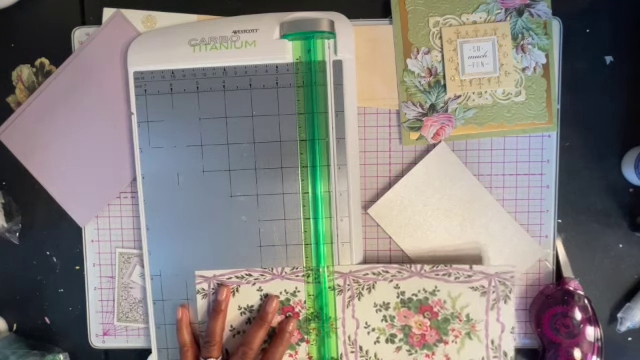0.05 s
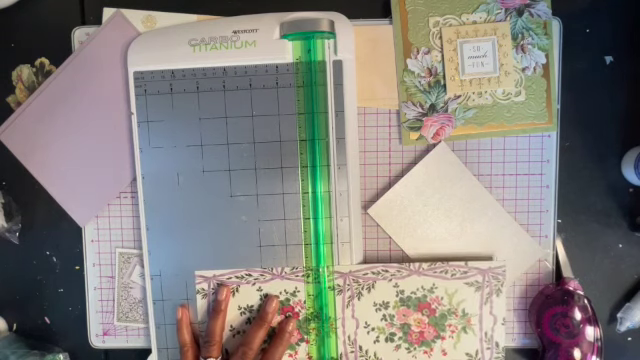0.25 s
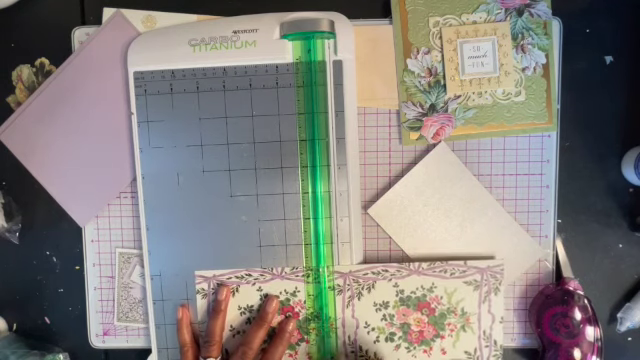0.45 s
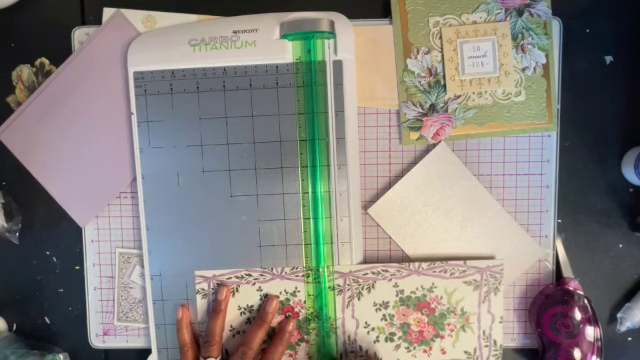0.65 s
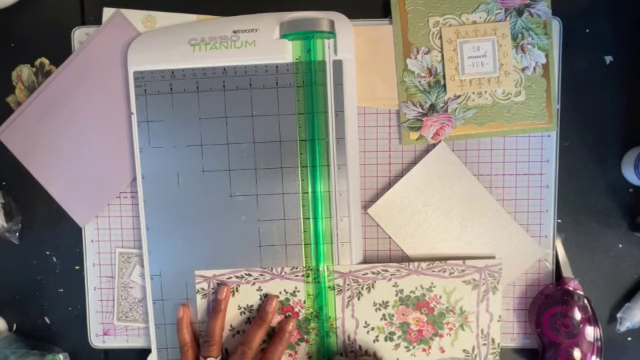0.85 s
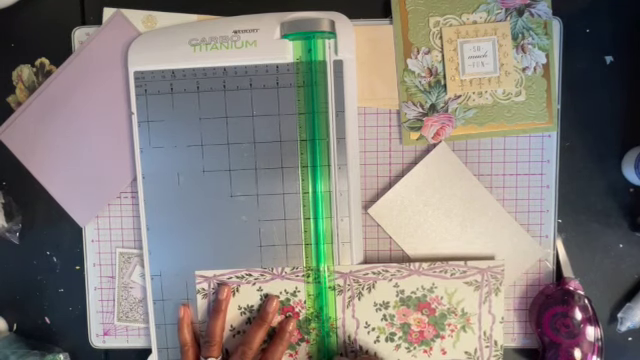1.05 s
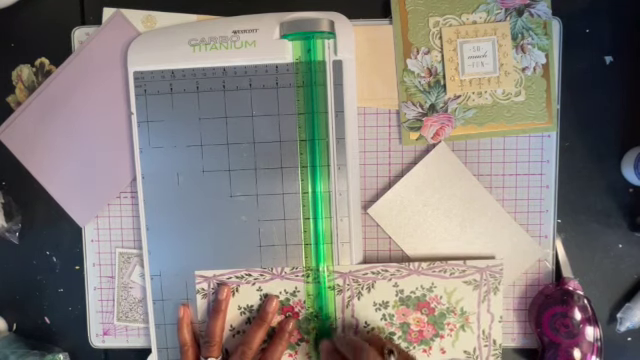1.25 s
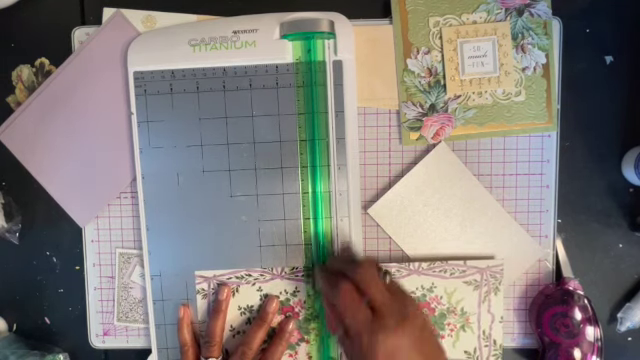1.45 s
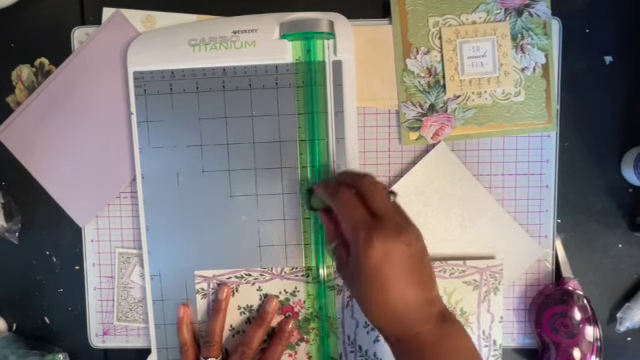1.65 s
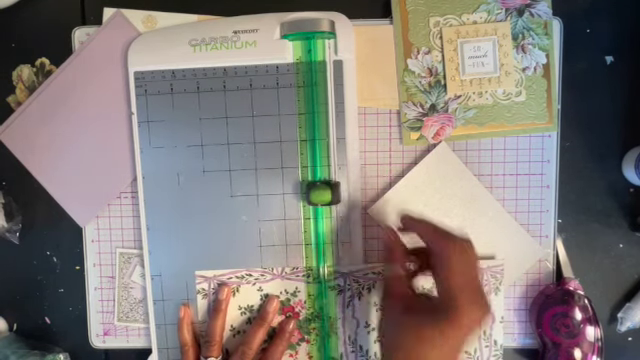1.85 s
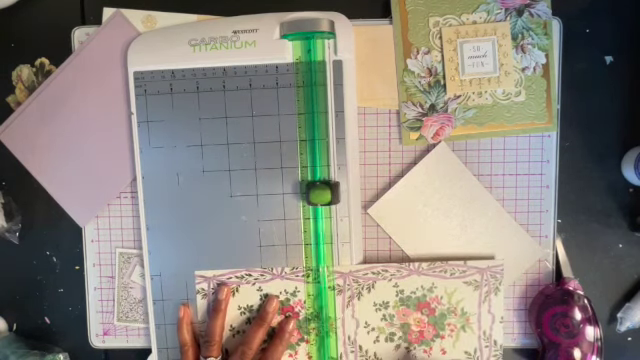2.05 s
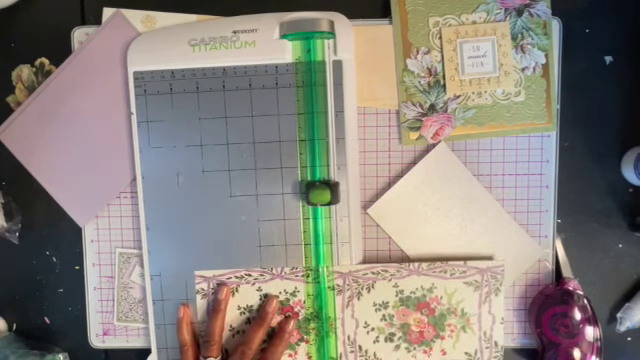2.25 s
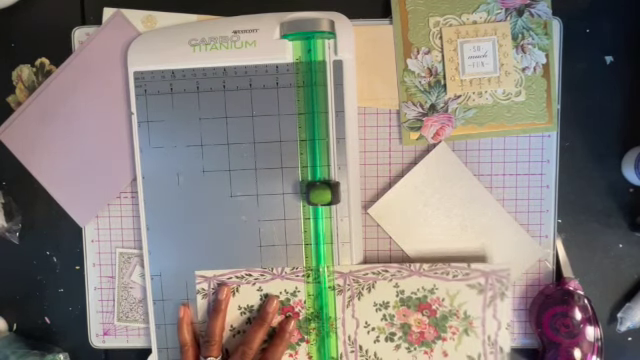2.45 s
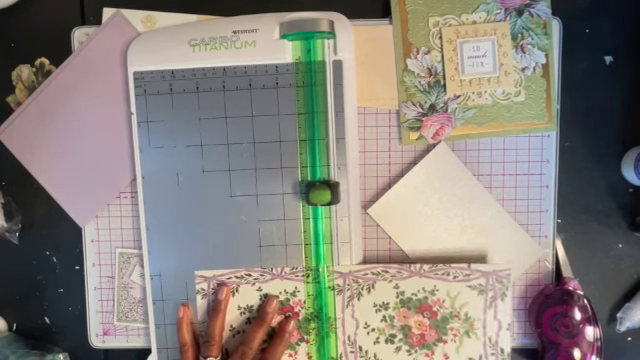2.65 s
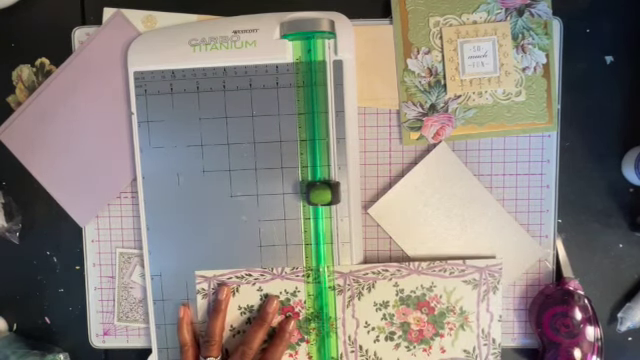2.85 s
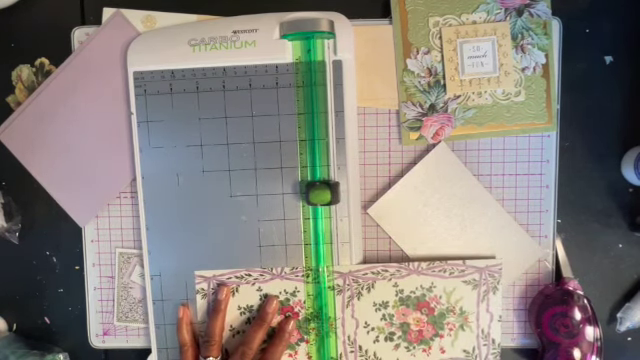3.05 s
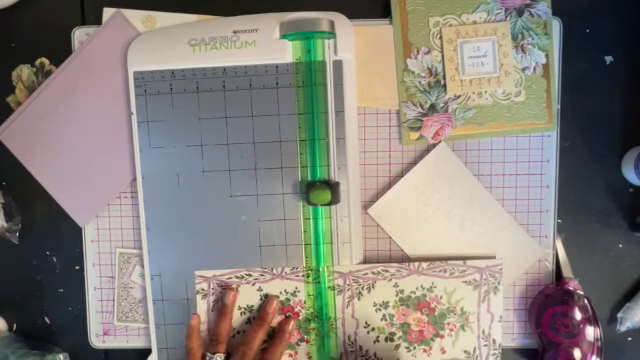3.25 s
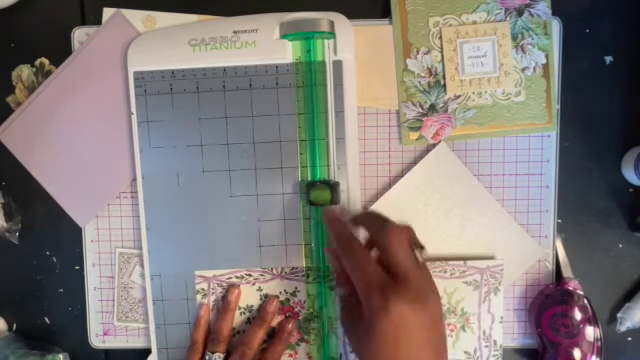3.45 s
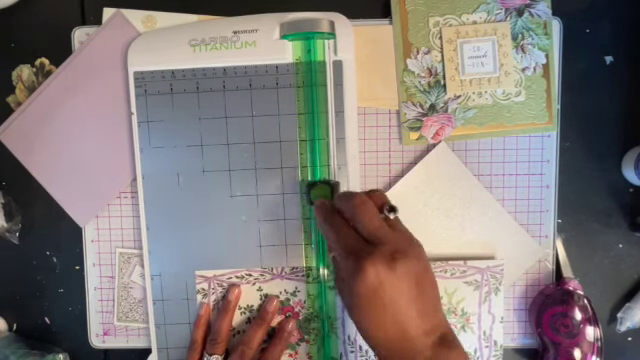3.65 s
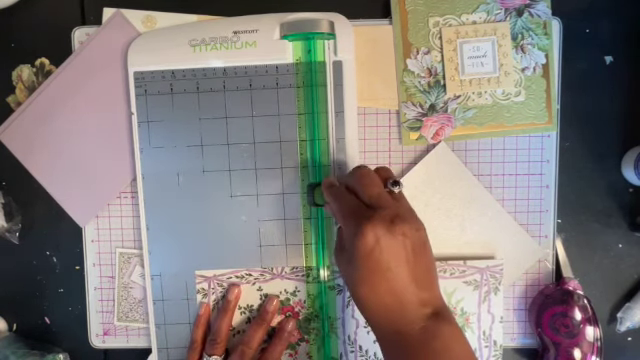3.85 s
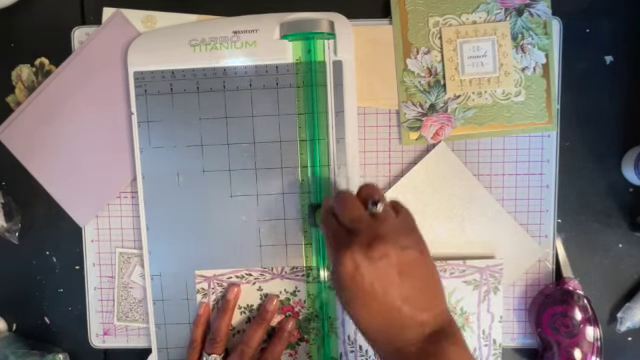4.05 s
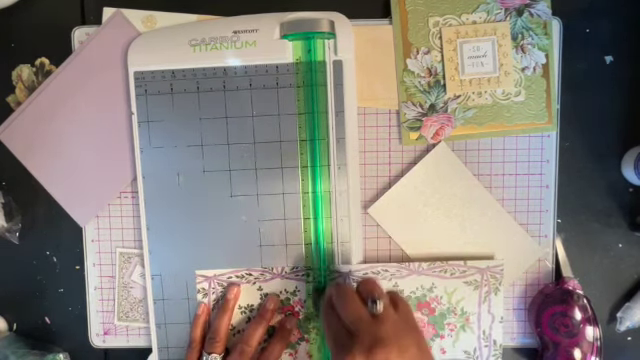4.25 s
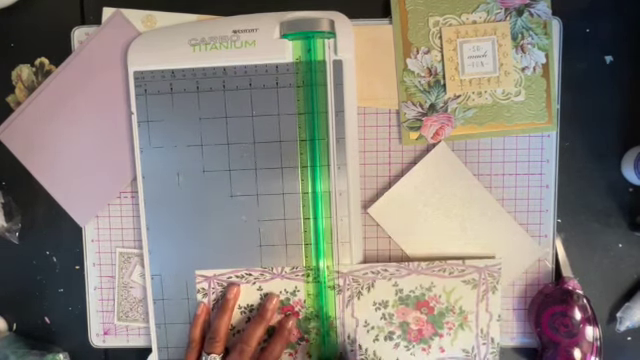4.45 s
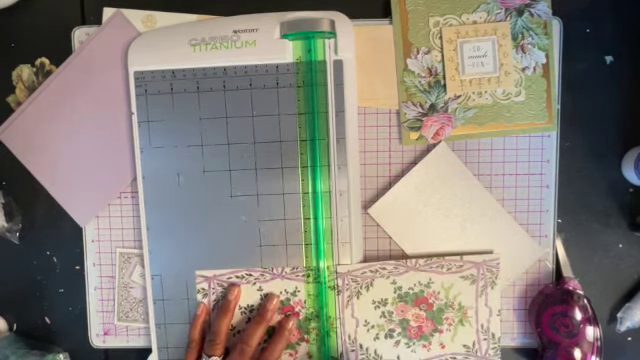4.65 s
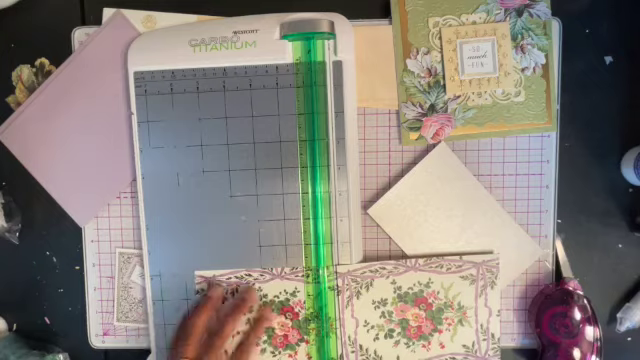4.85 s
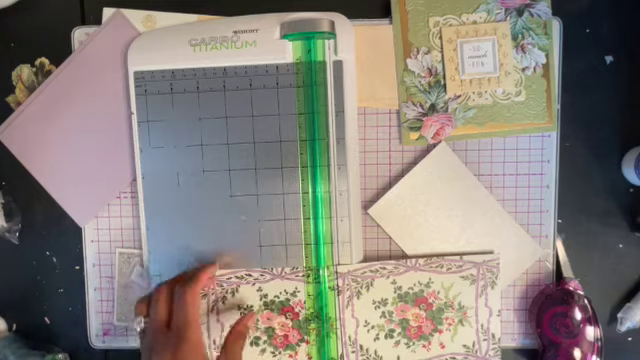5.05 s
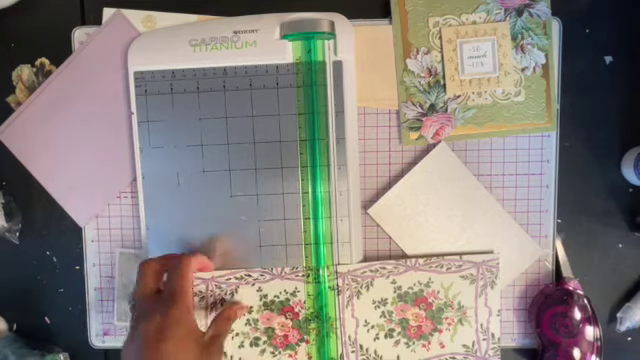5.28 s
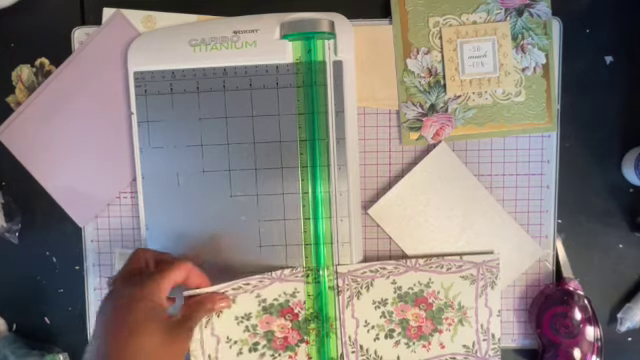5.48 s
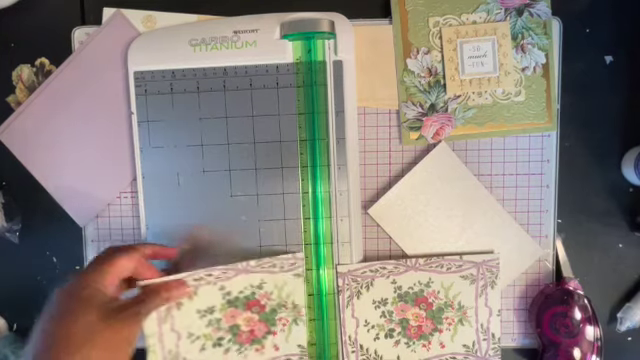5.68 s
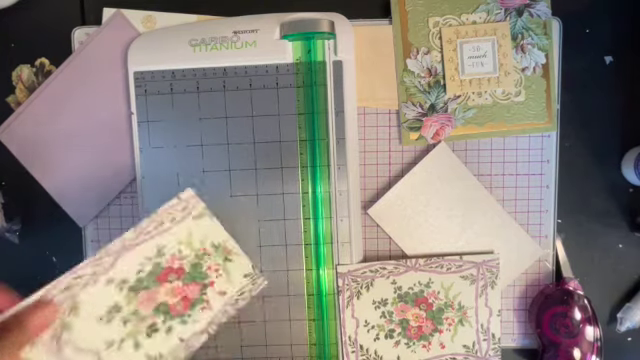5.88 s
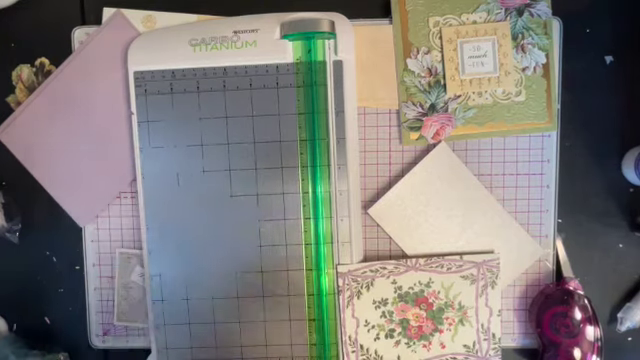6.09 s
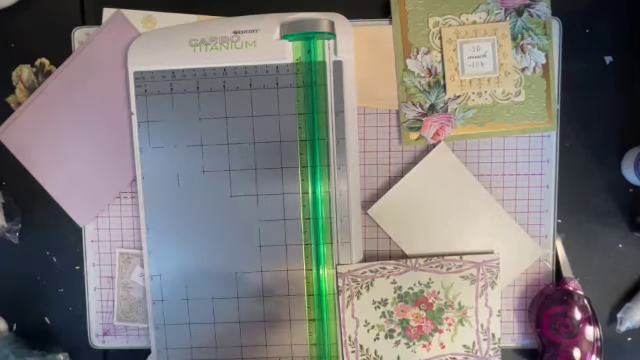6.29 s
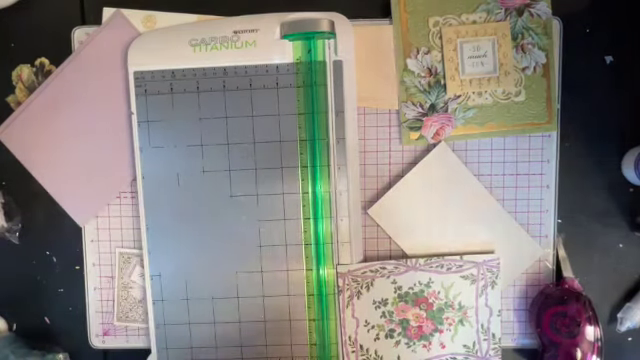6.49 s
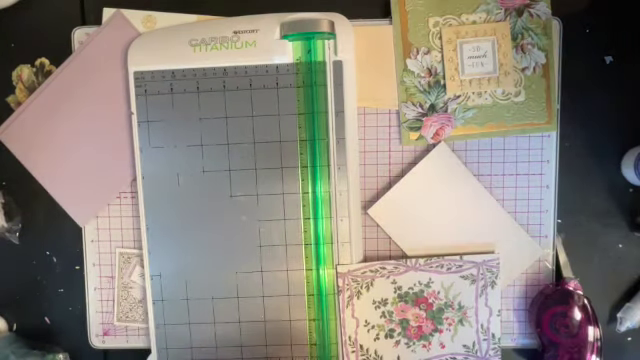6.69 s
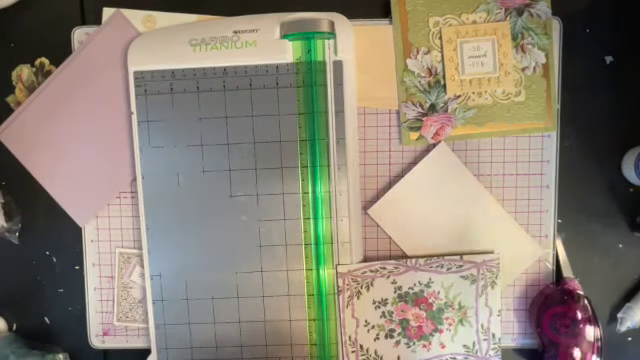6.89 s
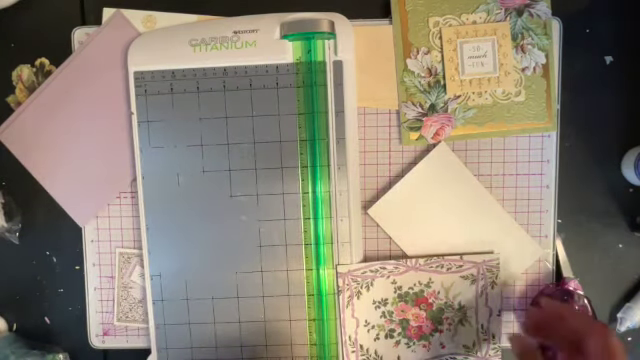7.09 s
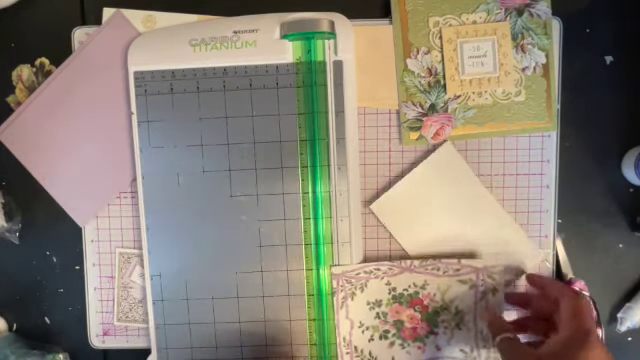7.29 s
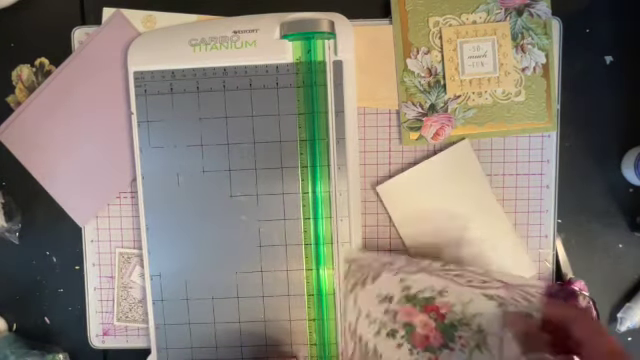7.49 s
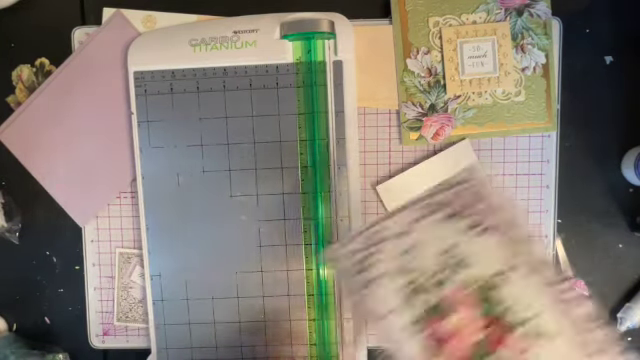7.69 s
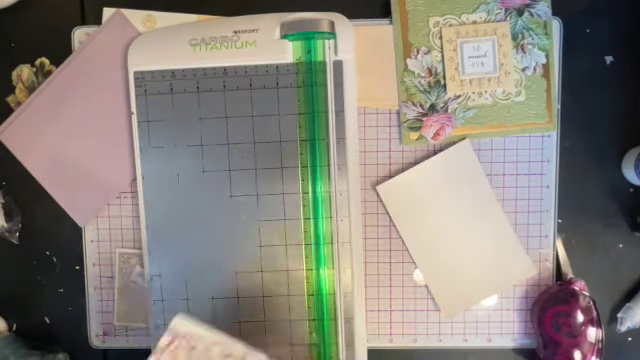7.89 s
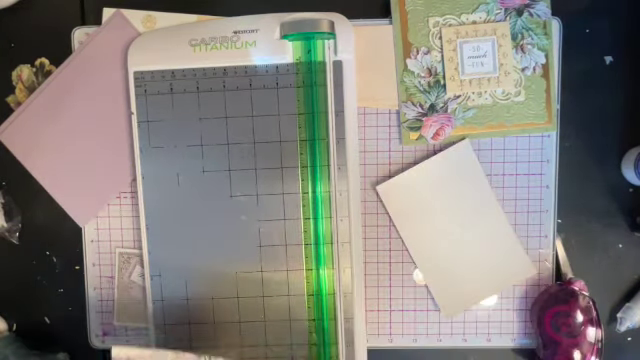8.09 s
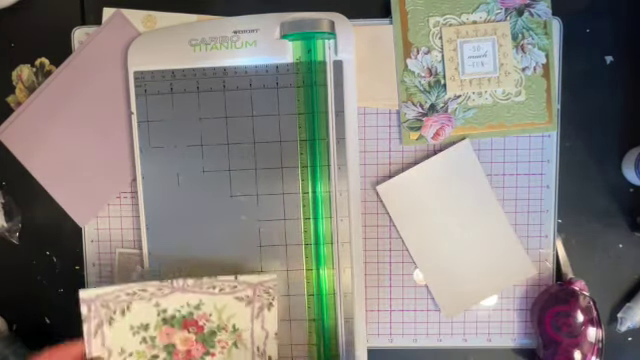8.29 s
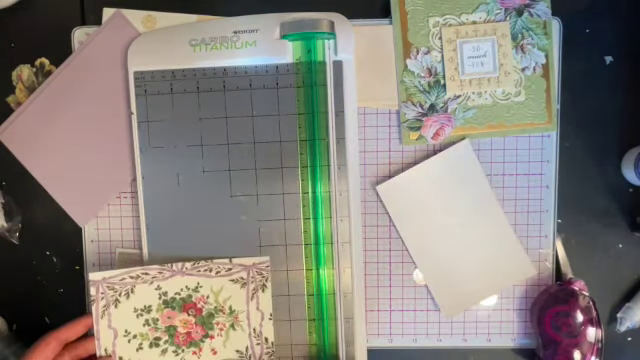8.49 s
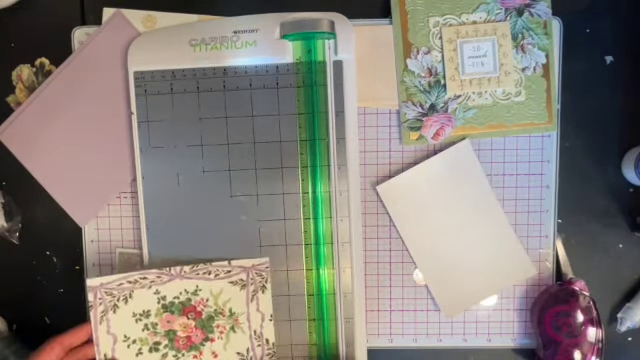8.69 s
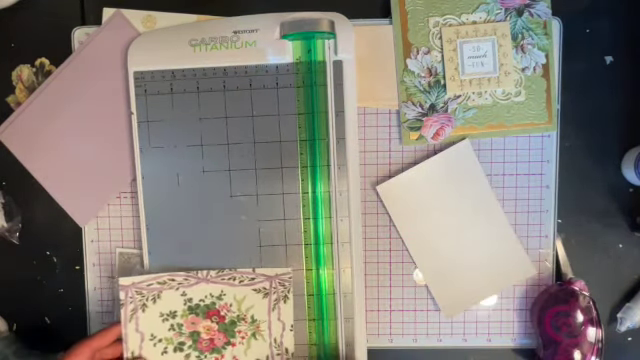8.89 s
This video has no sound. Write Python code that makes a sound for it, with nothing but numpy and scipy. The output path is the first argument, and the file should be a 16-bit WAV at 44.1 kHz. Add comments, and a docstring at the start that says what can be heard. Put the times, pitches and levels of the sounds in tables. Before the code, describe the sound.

Hollow plastic taps and tiny nail clicks open over a low hush of room air. A blade carriage slides lightly up its rail, clicks and rests. After a quiet gap it knocks, rips briskly through stiff card and hits its stop. Card edges drag and crackle, the rail snaps, card swishes away, and a table knock makes the trimmer ring briefly. Close, dry, small-room stereo sound.

```python
"""A plastic paper trimmer cuts cardstock on a craft table, heard by two close microphone ports in a small quiet room.
The guide rail is pressed down, the blade carriage slides up it, then is drawn back through the card to its end stop.
The rail is lifted, the two halves slide off the deck, and a hand knocks on the table as it picks one up.
Noise bursts and damped modes make the contacts; shaped noise makes friction, card and room air; gliding
resonances make the scrapes."""
import sys
import numpy as np
from scipy import signal
from scipy.fft import rfft, irfft, next_fast_len
from scipy.io import wavfile
from scipy.ndimage import uniform_filter1d, map_coordinates

SR = 44100
rng = np.random.default_rng(int(sys.argv[2]) if len(sys.argv) > 2 else 0)


def to_wav(s):
    """Save 16-bit WAV."""
    ch = np.atleast_2d(s).T  # columns
    pcm = np.round(np.clip(ch, -1, 1) * 32767)  # PCM
    wavfile.write(sys.argv[1], SR, pcm.astype(np.int16))


N = 393792

# Event levels are at the source, before panning and room. t60 is the time of a 60 dB decay.
# A rise or fall is the time taken by 20 dB.

# colour of the room air: f/Hz, level/dB
AIR_COLOUR = [(20, -21.5), (60, 0), (170, 1.5), (330, -12), (500, 0), (900, -10.5), (1200, -18),
              (2200, -18.5), (4000, -30.5), (15000, -49.5)]

# swishes of card faces and hands: peak t/s, level/dB, rise/s, fall/s
CARD_SWISHES = [(0.01, -50.5, 0.052, 0.075), (1.43, -51, 0.055, 0.2), (2.551, -58.5, 0.078, 0.24),
                (3.05, -58.5, 0.071, 0.057), (4.83, -63.5, 0.17, 0.99), (4.929, -50, 0.031, 0.03),
                (5.155, -48, 0.024, 0.0048), (5.27, -57, 0.059, 0.36), (5.442, -43.5, 0.012, 0.028),
                (5.62, -49.5, .12, 0.24), (5.944, -54.5, 0.024, 0.023), (6.094, -45, 0.006, 0.068),
                (6.18, -48, 0.047, 0.17), (6.201, -40.5, .012, 0.012), (6.8, -61, 0.28, 0.71),
                (7.235, -45, 0.032, 0.13), (7.384, -47.5, 0.11, 0.017), (7.475, -45, 0.079, 0.082),
                (7.682, -50, 0.063, 0.061), (7.946, -43, 0.13, 0.19), (8.328, -60.5, 0.15, 0.5),
                (8.76, -62.5, 0.22, 1)]
# the cut edge dragged out from under the rail in tugs: start t/s, stop t/s, level/dB, rise/s, fall/s
EDGE_DRAGS = [(5.415, 5.447, -50, .02, 0.045), (5.553, 5.699, -39, 0.054, 0.022)]
# card sticking and slipping under pressed fingers: start t/s, stop t/s, level/dB, rise/s, fall/s
CARD_JUDDERS = [(2.179, 2.25, -36, 0.021, 0.028), (2.577, 2.623, -49, 0.023, 0.05),
                (3.072, 3.083, -44, 0.044, 0.024)]
# colours of card face, cut edge and juddering card: f/Hz, level/dB
FACE_COLOUR = [(40, -6), (200, -3), (1400, -3), (4500, -6.5), (7000, -3.5), (11000, -13.5), (15500, -7)]
EDGE_COLOUR = [(350, -25.5), (630, -3), (850, -17), (1500, -11), (3100, -1), (4800, -6.5), (7000, -6.5),
               (15500, -14)]
JUDDER_COLOUR = [(60, -22), (180, 3.5), (360, 8.5), (480, -1), (680, -3), (1400, -9), (4000, -29.5),
                 (12000, -51.5)]

# sharp clicks of nails and card corners:
# t/s, tick level/dB, deck body re tick/dB, time for the chatter to fall 16 dB/s
CLICK_EVENTS = [(0.149, -54, -11.5, 0.0063), (0.921, -56, 2, 0.0044), (0.993, -62.5, 9.5, 0.0057),
                (2.086, -52.5, -4, 0.0014), (2.108, -50.5, -13, 0.0015), (2.491, -41.5, -15, 0.0023),
                (2.745, -51, -13.5, 0.0049), (4.132, -46, 4, 0.031), (6.135, -43.5, -1, 0.013),
                (6.16, -41, -13, 0.0037), (6.255, -46, -17.5, .01), (6.612, -54, -0.5, 0.02),
                (7.244, -27.5, -2, 0.011), (7.254, -32, 1, 0.0062), (7.846, -57.5, 2.5, 0.024),
                (8.229, -49, -4, 0.0076), (8.856, -49, -11.5, 0.0029)]
# thump over body; snap over tick, which also grows with the body's share (dB per dB)
CLICK_THUMP_DB, CLICK_SNAP_DB, SNAP_PER_BODY = 1, 0.5, 0.76

# knocks of rail, carriage and card on the deck:
# t/s, ring level/dB, thump re ring/dB, snap re ring/dB
DECK_KNOCKS = [(0.357, -33.5, -8.5, -3.5), (0.682, -40, -0.5, -14.5), (0.72, -53, 2, -4),
               (0.774, -38.5, -5, -8.5), (0.829, -51.5, -5, -16), (0.939, -45.5, -11, -15.5),
               (1.229, -45.5, -5, -19), (1.269, -39.5, -32, -8), (1.302, -45.5, -10, -7),
               (1.336, -45.5, -8, -11), (1.523, -49.5, -12, -7), (1.555, -49, -13, -20),
               (1.678, -52, -2, -5), (1.793, -48.5, 1, -10.5), (2.14, -39.5, 2, -4.5),
               (2.164, -37.5, -18, -12.5), (2.216, -37, -13, -26.5), (2.336, -53, 7.5, -18),
               (3.518, -52.5, 7.5, -5.5), (3.781, -27, -9.5, -17.5), (3.844, -30, -8.5, -7.5),
               (3.849, -32.5, -6, -17), (4.518, -25, -6.5, -5.5), (4.6, -54, -14, 6.5),
               (4.716, -33.5, -7.5, -2), (4.762, -42, -5, -28), (4.927, -46.5, 0.5, -22.5),
               (4.977, -38, -0.5, -7), (5.11, -33, -8.5, -19), (5.218, -47, -8, -15),
               (5.233, -38, -6, -17.5), (5.51, -37, -15.5, -15.5), (5.711, -24, -13, -6),
               (7.285, -39.5, 1, -9), (8.458, -39.5, -5, -13)]
CHATTER_S, KNOCK_TICK_DB = 0.0075, -8  # chatter's time to fall 16 dB; top octaves re snap
# the trimmer's base on the table, nominal modes: f/Hz, level/dB, t60/s
BASE_MODES = [(139.2, 1, 0.13), (191.7, 0.5, 0.069), (236.1, 0, 0.098), (385, -3, 0.076)]
# its plastic deck, nominal modes: f/Hz, level/dB, t60/s
DECK_MODES = [(575, -2, 0.033), (636.8, -0.5, 0.08), (754.8, 0, 0.059), (872, -4.5, 0.037),
              (1362, -5.5, 0.028)]
FIRM_DB, FIRM_GROWTH = -38.5, 0.47  # above this level the third deck mode is lifted (dB; dB per dB)
# colours of a contact's crack, top-octave tick, plastic clatter and table thump: f/Hz, level/dB
CRACK_COLOUR = [(600, -11), (1900, 2), (2950, 2), (4700, -8), (9000, -26)]
TICK_COLOUR = [(2500, -15.5), (5200, 8.5), (7400, 4), (16000, -7)]
CLATTER_COLOUR = [(380, -25), (700, 1.5), (1700, -14.5), (3200, -41)]
TABLE_COLOUR = [(18, -15.5), (50, 3.5), (130, -7.5), (300, -11), (900, -41.5)]

# dull bumps of hands, carriage and flexing card: t/s, level/dB, f/Hz, t60/s
DULL_BUMPS = [(0.37, -38, 226, 0.058), (0.69, -35, 219, 0.067), (2.166, -32.5, 373, 0.047),
              (2.218, -36, 332, 0.059), (3.358, -57, 850, .04), (3.545, -41, 135, 0.11),
              (4.145, -41, 149, 0.16), (4.515, -29, 201, 0.089), (4.844, -27, 237.3, 0.13),
              (5.745, -36, 131, 0.23), (5.884, -47.5, 395, 0.06), (6.034, -47, 407, 0.07),
              (6.14, -42, 405, 0.027), (6.257, -47.5, 1140, 0.02), (7.113, -33.5, 151, 0.16),
              (7.245, -26, 303, 0.026), (7.765, -43, 434, 0.068), (8.242, -50, 493, 0.058),
              (8.679, -47.5, 780, 0.13)]
BUMP_RISE_S = .006  # time constant of the soft onset

# the carriage pushed up the rail, then pulled back:
# start t/s, stop t/s, run-up/s (per 20 dB), starting rumble level/dB, hiss level at the ends/dB, pitch ratio
CARRIAGE_STROKES = [(1.15, 1.66, 0.027, -56.5, -61, 1.05), (4.046, 4.518, 0.13, -42, -55.5, 1.057)]
COAST_S, SAG_DB_PER_S, MID_STROKE_DB = 0.032, 9.5, 6  # fall; hand pressure eases; hiss peaks with speed
CUT_START, CUT_STOP, CUT_DB = 4.2, 4.505, -38  # the blade is in the card (s, s, dB)
BITE_S, EXIT_S = 0.013, 0.012  # rise and fall of the cut
# colours of the rumble (before the stroke's pitch ratio), rail hiss and cutting blade: f/Hz, level/dB
RUMBLE_COLOUR = [(45, -5), (240, -2), (350, -21), (480, -14.5), (620, 3), (750, -1), (1150, -10),
                 (3500, -33.5)]
GLIDE_COLOUR = [(800, -8), (1350, -3), (2200, -8), (2620, 5), (3000, -1), (4000, -8), (9500, -11)]
BLADE_COLOUR = [(500, -16), (1100, -4.5), (1800, -8.5), (3100, -5), (4500, -11), (6600, -7), (7400, 3.5),
                (8600, -10), (11000, -30), (15500, -7)]

# the rail rattling under hand or carriage, and the carriage striking its end: t/s, level/dB
RAIL_CLACKS = [(1.207, -48), (2.164, -40.5), (2.22, -45), (4.519, -24), (4.599, -43.5)]
# the guide rail, nominal modes: f/Hz, level/dB, t60/s
RAIL_MODES = [(883, -1, 0.037), (1127, -12, 0.055), (1363, 4, 0.025), (1955, -5.5, 0.029),
              (2600, -17, 0.033)]

# the rail snaps as it is jogged, unlatched and dropped: t/s, level/dB, f/Hz, pan towards the left port/dB
STRIP_SNAPS = [(1.302, -45, 2600, -3), (4.716, -28, 2510, -3), (5.711, -26, 3300, 0.5)]
SNAP_S, SNAP_RING_DB, SNAP_RING_S = 0.003, -17.5, 0.014  # snap t60; after-ring level and t60

# scrapes gliding as carriage, blade or card edge travels: start t/s, stop t/s, from f/Hz, to f/Hz, level/dB
GLIDING_SCRAPES = [(4.054, 4.123, 730, 761, -45), (4.205, 4.268, 1000, 1096, -42.5),
                   (4.295, 4.314, 640, 681, -45.5), (4.345, 4.421, 1340, 1404, -46.5),
                   (4.22, 4.391, 3066, 2347, -47.5), (5.409, 5.483, 2290, 2660, -53),
                   (6.202, 6.199, 1800, 2110, -49)]
SCRAPE_Q, SCRAPE_EDGE_S = 3.6, 0.02  # cycles between random knots of the voice; rise and fall
SCRAPE_ROUGH_DB = 0.5  # depth of the uneven grip

# the stiff card crackles as it is bent up and flicks free: t/s, level/dB
CARD_CRACKLES = [(5.343, -46.5), (5.393, -46.5), (5.713, -26), (7.245, -28), (7.259, -33.5), (8.229, -54.5)]
CRACKLE_S = 0.033  # t60
# colour of the crackle: f/Hz, level/dB
CRACKLE_COLOUR = [(900, -12.5), (2100, -12.5), (3100, 0.5), (5200, -12.5), (7300, -9), (10000, -19)]

# the trimmer ringing with no hand on it, nominal modes: f/Hz, level/dB, t60/s
FREE_MODES = [(139.3, -17, 0.3), (539, 2, 0.18), (631, -4, 0.21), (750, 2, 0.24)]
JOLT_S, JOLT_DB = 7.258, -30.5

# decay of the room: f/Hz, t60/s
ROOM_T60 = [(150, 0.32), (1000, 0.14), (14000, 0.064)]
# phase by which the left port leads the right: f/Hz, phase/rad
PORT_LEAD = [(1500, 0), (6700, 1.3), (8500, 3.0), (11800, 3.5), (13700, 6.2)]
RAIL_PAN_DB, CARD_PAN_DB = -2.5, -0.5  # added at the left port, taken off at the right
TOP_HZ = 16000


def amp(db):
    """Decibels to gain."""
    return 10 ** (np.asarray(db) / 20)


def unit(x):
    """Scale to rms 1."""
    return x / np.sqrt(np.mean(x ** 2) + 1e-20)


def blow(x):
    """Scale to the energy of 10 ms at rms 1."""
    return x * np.sqrt(.01 * SR / (np.sum(x ** 2) + 1e-20))


def along(points, hz):
    """Read (Hz, value) points on a log frequency axis."""
    f, v = np.transpose(points)
    return np.interp(np.log(hz + 1), np.log(f), v)


def wobble(rate):
    """Draw a smooth random curve through bounded knots, rate of them a second."""
    knots = np.tanh(rng.standard_normal(int(N * rate / SR) + 4))
    return 2 * map_coordinates(knots, [np.arange(N) * rate / SR])


def filtered(x, response):
    """Multiply the spectrum of x by a response of frequency."""
    size = next_fast_len(N + SR // 2)
    hz = np.fft.rfftfreq(size, 1 / SR)
    return irfft(rfft(x, size) * response(hz), size)[..., :N]


def impulse(tone, size=2048):
    """Turn a colour into a causal, minimum-phase impulse response by folding its cepstrum."""
    gain = amp(along(tone, np.fft.rfftfreq(size, 1 / SR)))
    cepstrum = irfft(np.log(gain))
    cepstrum[1:size // 2] *= 2
    cepstrum[size // 2 + 1:] = 0
    return irfft(np.exp(rfft(cepstrum)))


def coloured(force, tone):
    """Hear a force through a colour."""
    return signal.fftconvolve(force, impulse(tone))[:len(force)]


def fade(t, t60):
    """Decay by 60 dB in t60 seconds."""
    return np.exp(-np.log(1000) * t / t60)


def swell(start, stop, rise, fall):
    """Climb 20 dB per rise time, hold from start to stop, drop 20 dB per fall time."""
    t = np.arange(N) / SR
    before = np.maximum(start - t, 0)
    after = np.maximum(t - stop, 0)
    return amp(-20 * (before / rise + after / fall))


def add(track, s, x):
    """Mix x into the track from time s."""
    start = max(round(s * SR), 0)
    track[start:start + len(x)] += x[:len(track) - start]


def ring(modes, t, scatter_db, detune):
    """Sum damped modes; each blow lands elsewhere and the hand loads them differently."""
    hz, db, t60 = np.transpose(modes)[:, :, None]
    strength, shift, side = rng.standard_normal((3, len(hz), 1))
    gain = np.sign(side) * amp(db + scatter_db * strength)
    tone = np.sin(2 * np.pi * hz * (1 + detune * shift) * t)
    return np.sum(gain * tone * fade(t, t60), axis=0)


def rub(tone, grain_rate, grain_share, flutter_db):
    """Friction of rms 1: a haze of fibres plus single catches (grain_rate a second), under uneven pressure."""
    catches = (rng.random(N) < grain_rate / SR) * rng.uniform(-1.34, 1, N)
    share = np.clip(grain_share, 0, 1)  # of the power
    force = np.sqrt(1 - share) * rng.standard_normal(N) + np.sqrt(share) * unit(catches)
    pressed = force * amp(flutter_db * wobble(45))
    # as the contact point travels, small resonances come and go
    z = signal.stft(pressed, nperseg=512)[2]
    patches = uniform_filter1d(rng.standard_normal(z.shape), size=3, axis=0)
    patches = uniform_filter1d(patches, size=16, axis=1)
    uneven = z * amp(2.3 * unit(patches))
    return unit(coloured(signal.istft(uneven, nperseg=512)[1][:N], tone))


def contact(thump_db, ring_db, snap_db, tick_db, chatter):
    """A contact scuffs, cracks, chatters, rings the deck and rocks base and table; returns (lead-in, hit)."""
    t = np.arange(SR // 3) / SR

    def burst(t60):
        return rng.standard_normal(len(t)) * fade(t, t60)

    force = burst(3.76 * chatter)
    force[0] += 1.5  # first impact
    lift_db = FIRM_GROWTH * max(ring_db - FIRM_DB, 0)
    modes = [(hz, db + lift_db * (k == 2), t60) for k, (hz, db, t60) in enumerate(DECK_MODES)]
    deck_ring = ring(modes, t, scatter_db=2, detune=.012) * (1 - np.exp(-t / 0.0018))
    deck = blow(deck_ring) + 0.43 * blow(coloured(burst(0.067), CLATTER_COLOUR))
    base_ring = ring(BASE_MODES, t, scatter_db=1.5, detune=0.074) * (1 - np.exp(-t / 0.022))
    base = blow(base_ring) + 0.52 * blow(coloured(burst(0.44), TABLE_COLOUR))
    # only the hardest instants of the chatter reach the top octaves
    spikes = force * np.abs(force)
    crack = amp(snap_db) * blow(coloured(force, CRACK_COLOUR))
    tick = amp(tick_db) * blow(coloured(spikes, TICK_COLOUR))
    # the surfaces scuff with growing force just before they seat
    scuff = burst(5 * chatter)[:SR // 30][::-1]
    lead = amp(snap_db - 15.5) * blow(coloured(scuff, CRACK_COLOUR))
    lead += amp(ring_db - 19.0) * blow(coloured(scuff, CLATTER_COLOUR))
    return lead, amp(thump_db) * blow(base) + amp(ring_db) * blow(deck) + crack + tick


def background():
    """A low, steady rush of room air: noise whose long waves are alike at both ports."""
    mid, side = filtered(rng.standard_normal((2, N)), lambda hz: amp(along(AIR_COLOUR, hz)))
    side = filtered(side, lambda hz: hz / np.hypot(hz, 500))
    return amp(-62.0) * unit(np.array([mid + side, mid - side]))


def card():
    """Friction noise: the card's face swishes, its edge drags, and under pressure it sticks and slips."""
    brushing = sum(amp(db) * swell(s, s, rise, fall) for s, db, rise, fall in CARD_SWISHES)
    dragging = sum(amp(db) * swell(start, stop, rise, fall) for start, stop, db, rise, fall in EDGE_DRAGS)
    pressing = sum(amp(db) * swell(start, stop, rise, fall) for start, stop, db, rise, fall in CARD_JUDDERS)
    face = brushing * rub(FACE_COLOUR, grain_rate=290, grain_share=0.23, flutter_db=2.0)
    edge = dragging * rub(EDGE_COLOUR, grain_rate=970, grain_share=0.45, flutter_db=1.8)
    # the card lets go in separate slips at an uneven rate
    slip_rate = 210 * amp(5.2 * wobble(160))
    slips = np.diff(np.floor(np.cumsum(slip_rate) / SR), prepend=0)
    grip = unit(slips * amp(2.4 * wobble(110))) + 1.2 * rng.standard_normal(N)
    return face + edge + pressing * unit(coloured(grip, JUDDER_COLOUR))


def clicks():
    """Small, sharp contacts are mostly tick; each has its own share of deck body, and snap grows with it."""
    out = np.zeros(N)
    for s, db, body_db, chatter in CLICK_EVENTS:
        ring_db = db + body_db
        snap_db = db + CLICK_SNAP_DB + SNAP_PER_BODY * body_db
        lead, hit = contact(ring_db + CLICK_THUMP_DB, ring_db, snap_db, db, chatter)
        add(out, s - len(lead) / SR, np.concatenate([lead, hit]))
    return out


def knocks():
    """Plastic meets plastic or card: the deck rings, heavy knocks thump and hard ones snap."""
    out = np.zeros(N)
    for s, db, weight_db, hard_db in DECK_KNOCKS:
        snap_db = db + hard_db
        lead, hit = contact(db + weight_db, db, snap_db, snap_db + KNOCK_TICK_DB, CHATTER_S)
        add(out, s - len(lead) / SR, np.concatenate([lead, hit]))
    return out


def bumps():
    """Soft pushes wake one loosely tuned resonance and little treble; a hand that stays down damps it."""
    out, t = np.zeros(N), np.arange(SR // 3) / SR
    for s, db, hz, t60 in DULL_BUMPS:
        tone = blow(np.sin(2 * np.pi * hz * t) * fade(t, t60) * (1 - np.exp(-t / BUMP_RISE_S)))
        puff_colour = [(hz / 4, -12), (hz, 0), (2 * hz, -14), (12 * hz, -75)]
        puff = coloured(rng.standard_normal(len(t)) * fade(t, 1.7 * t60), puff_colour)
        add(out, s, amp(db) * blow(tone + 0.74 * blow(puff)))
    return out


def cutter():
    """Friction noise: the carriage rumbles in the deck and hisses on the rail; the blade severs dense fibres."""
    t, rumble, speed = np.arange(N) / SR, np.zeros(N), np.zeros(N)
    for start, stop, run_up, rumble_db, hiss_db, pitch in CARRIAGE_STROKES:
        moving = swell(start, stop, run_up, COAST_S)
        elapsed = np.clip(t - start, 0, stop - start)
        tone = [(hz * pitch, db) for hz, db in RUMBLE_COLOUR]
        rolling = rub(tone, grain_rate=120, grain_share=0.42, flutter_db=2.0)
        rumble += moving * amp(rumble_db - SAG_DB_PER_S * elapsed) * rolling
        speed += moving * amp(hiss_db + MID_STROKE_DB * np.sin(np.pi * elapsed / (stop - start)))
    glide = speed * rub(GLIDE_COLOUR, grain_rate=720, grain_share=0.24, flutter_db=2.5)
    cutting = amp(CUT_DB) * swell(CUT_START, CUT_STOP, BITE_S, EXIT_S)
    cut = cutting * rub(BLADE_COLOUR, grain_rate=1600, grain_share=0.66, flutter_db=1.1)
    return rumble + glide + cut


def rail_hits():
    """Jogged by a hand or struck by the carriage, the whole rail clacks in a few damped modes."""
    out, t = np.zeros(N), np.arange(SR // 5) / SR
    for s, db in RAIL_CLACKS:
        clack = ring(RAIL_MODES, t, scatter_db=1.0, detune=0.008) * (1 - np.exp(-t / 0.0015))
        add(out, s, amp(db) * blow(clack))
    return out


def rail_snaps():
    """The stiff strip lets go in one instant: a dry, pitched snap and a weaker after-ring, at each port."""
    out, t = np.zeros((2, N)), np.arange(SR // 20) / SR
    for s, db, hz, pan_db in STRIP_SNAPS:
        dying = fade(t, SNAP_S) + amp(SNAP_RING_DB) * fade(t, SNAP_RING_S)
        onset = 1 - np.exp(-(hz * t) ** 2)
        snap = blow(np.sin(2 * np.pi * hz * t) * dying * onset)
        for port, side in zip(out, (1, -1)):
            add(port, s, amp(db + side * pan_db) * snap)
    return out


def scrapes():
    """Sliding changes the length free to vibrate, so the resonance glides while the grip catches and eases."""
    out, t = np.zeros(N), np.arange(-SR // 10, SR // 4) / SR

    def sway(at):
        return map_coordinates(rng.standard_normal(len(t) // 2), [at], mode="mirror")

    for start, stop, from_hz, to_hz, db in GLIDING_SCRAPES:
        cycles = np.cumsum(np.interp(t, [0, stop - start], [from_hz, to_hz])) / SR
        # two independent quadrature parts make a narrow band of noise around the glide
        voice = sway(cycles / SCRAPE_Q) * np.sin(2 * np.pi * cycles)
        voice += sway(cycles / SCRAPE_Q) * np.cos(2 * np.pi * cycles)
        grip = amp(SCRAPE_ROUGH_DB * np.tanh(sway(170 * (t - t[0]))))
        outside = np.maximum(-t, 0) + np.maximum(t - (stop - start), 0)
        add(out, start + t[0], amp(db - 20 * outside / SCRAPE_EDGE_S) * unit(voice * grip))
    return out


def crackles():
    """Each buckle of the card is a quick, dry spray of tiny snaps: spiky noise dying away."""
    out, t = np.zeros(N), np.arange(SR // 10) / SR
    for s, db in CARD_CRACKLES:
        noise = rng.standard_normal(len(t))
        snaps = noise * np.abs(noise) * fade(t, CRACKLE_S)
        add(out, s, amp(db) * blow(coloured(snaps, CRACKLE_COLOUR)))
    return out


def jolt():
    """The knock on the table shakes the unheld trimmer; clusters of close modes beat unevenly as they die."""
    out, t = np.zeros(N), np.arange(SR // 2) / SR
    modes = sum(ring(FREE_MODES, t, scatter_db=1, detune=.06) for _ in range(6))
    add(out, JOLT_S, amp(JOLT_DB) * blow(modes * (1 - np.exp(-t / BUMP_RISE_S))))
    return out


def room(x):
    """Table and walls answer briefly as decaying noise; long waves reach both ports alike."""
    hz, t, z = signal.stft(rng.standard_normal((2, SR // 3)), SR, nperseg=256)
    tail = signal.istft(z * fade(t, along(ROOM_T60, hz)[:, None]), SR, nperseg=256)[1]
    near = rng.standard_normal(tail.shape) * fade(np.arange(tail.shape[1]) / SR, 0.019)
    answer = amp(-15.5) * tail / np.linalg.norm(tail[0]) + amp(-12.0) * near / np.linalg.norm(near[0])
    delayed = np.pad(x, (SR // 700, 0))  # 1/700 s to the first reflection
    mid, side = signal.fftconvolve(delayed[None], answer, axes=1)[:, :N]
    side = amp(3.0) * filtered(side, lambda hz: (hz / np.hypot(hz, 280)) ** 2)
    return np.array([mid + side, mid - side])


def scene():
    """The trimmer lies under the two ports; its rail and the card are a little to the right."""
    handling = card() + clicks() + bumps() + crackles()
    trimmer = knocks() + cutter() + scrapes() + jolt()
    rail, snaps = rail_hits(), rail_snaps()
    sides = np.array([[1], [-1]])  # left, right
    placed = trimmer + snaps + rail * amp(RAIL_PAN_DB * sides) + handling * amp(CARD_PAN_DB * sides)
    # half the phase lead at each port, with opposite signs
    direct = filtered(placed, lambda hz: np.exp(.5j * sides * along(PORT_LEAD, hz)))
    reflected = amp(1.0) * room(trimmer + rail + snaps.mean(axis=0) + handling)
    return direct + reflected + background()


def record(dry):
    """The microphones shed rumble below 34 Hz and keep nothing above their band limit."""
    low_cut = signal.butter(4, 34, "highpass", fs=SR, output="sos")
    return filtered(signal.sosfilt(low_cut, dry), lambda hz: hz < TOP_HZ)


dry = scene()
out = record(dry)
to_wav(out)
```